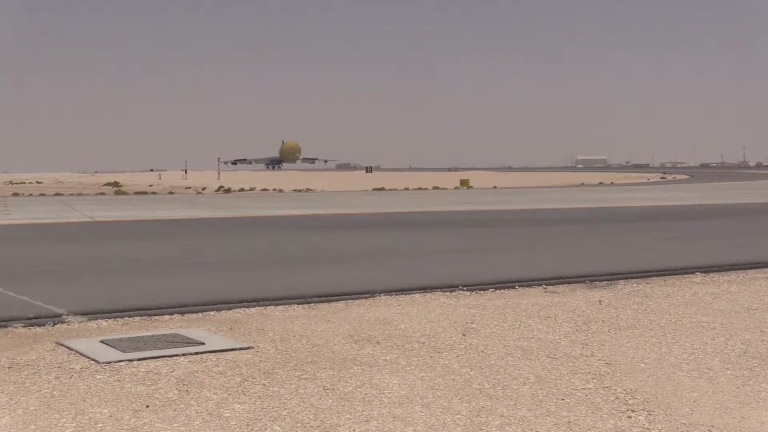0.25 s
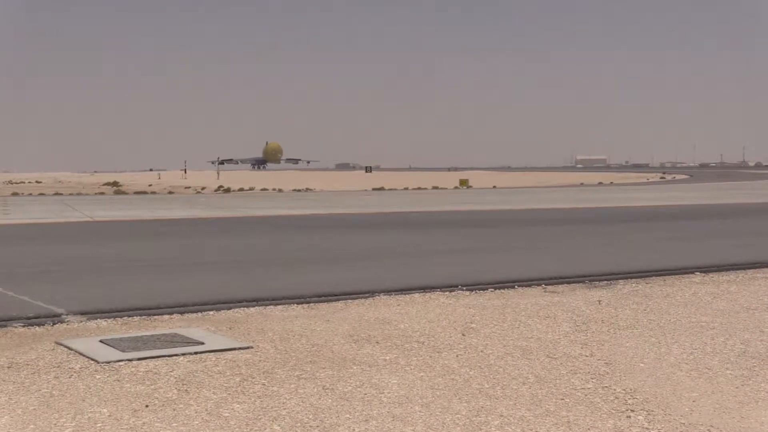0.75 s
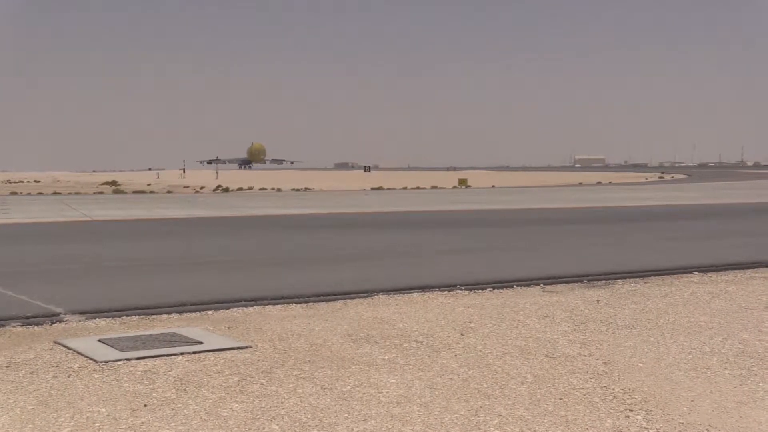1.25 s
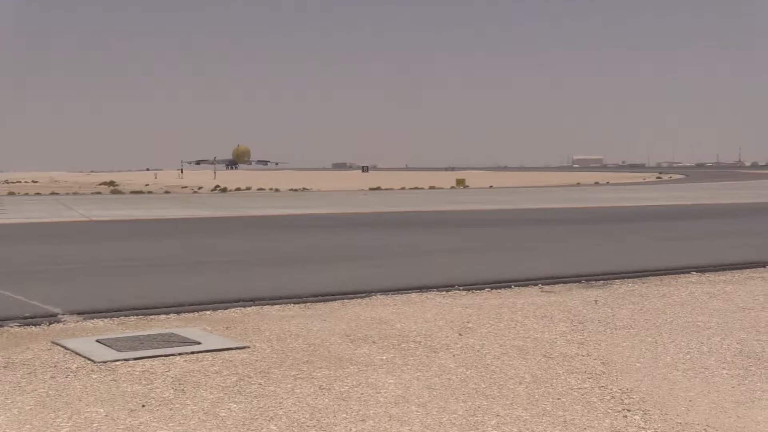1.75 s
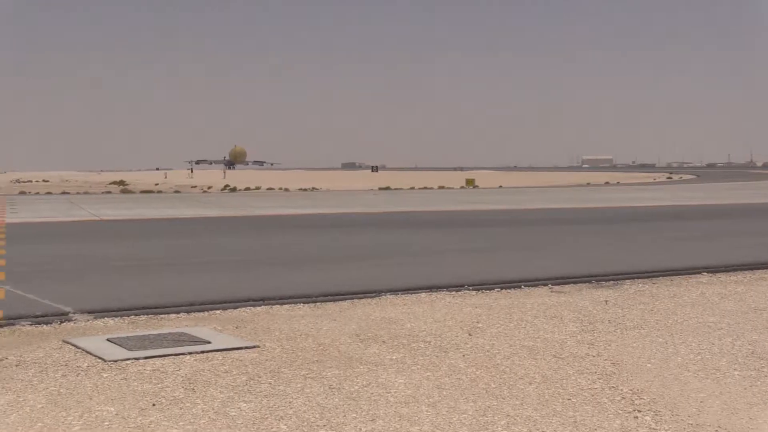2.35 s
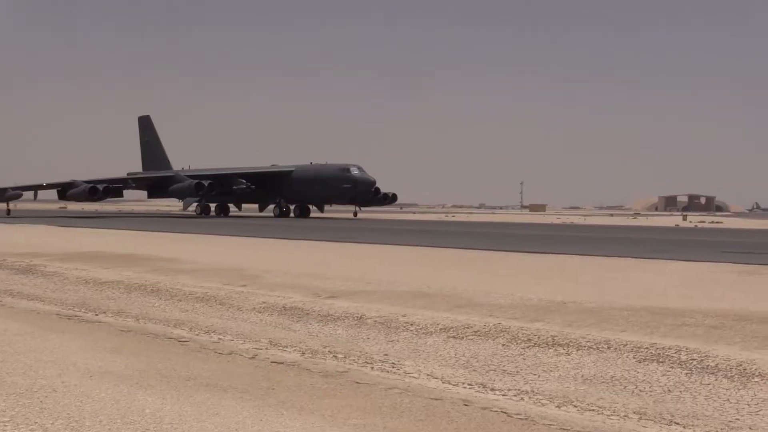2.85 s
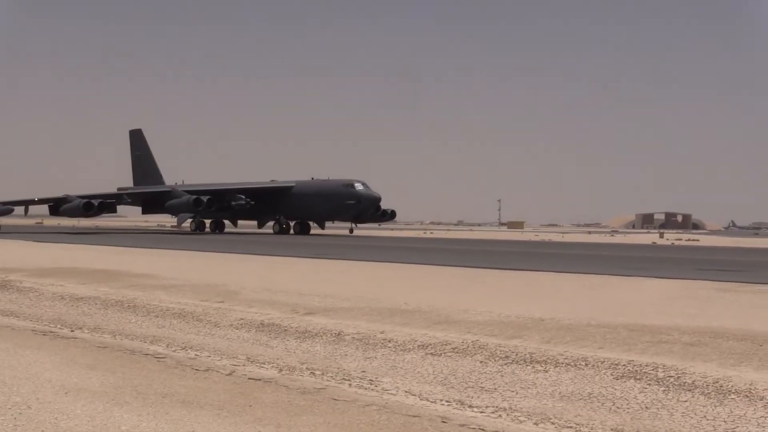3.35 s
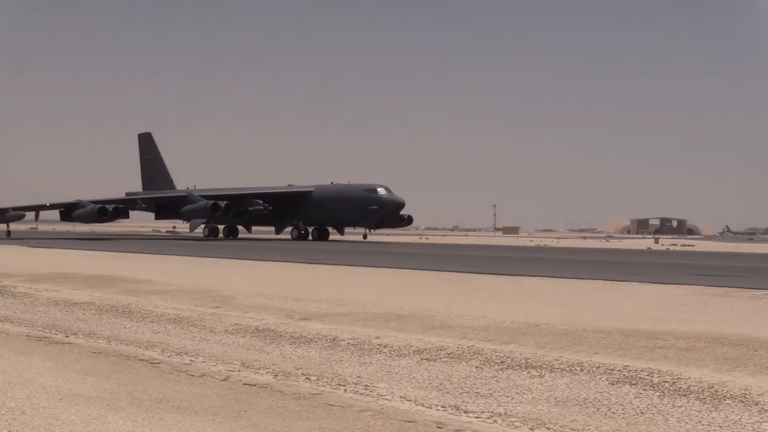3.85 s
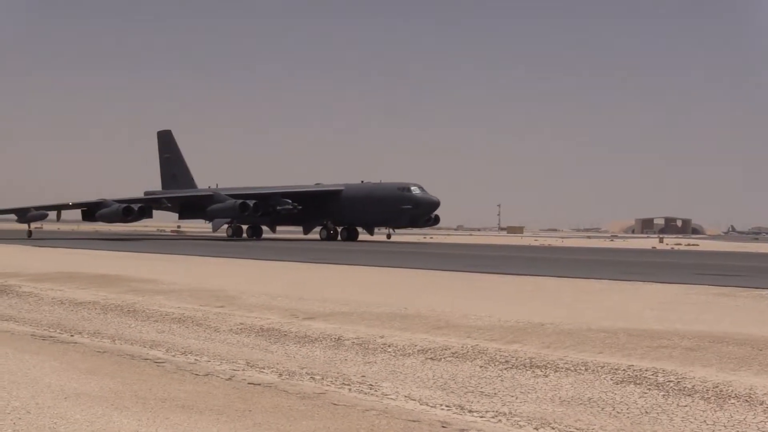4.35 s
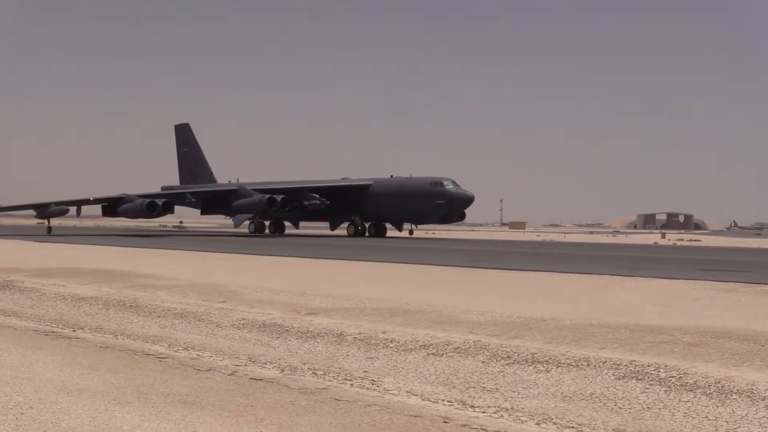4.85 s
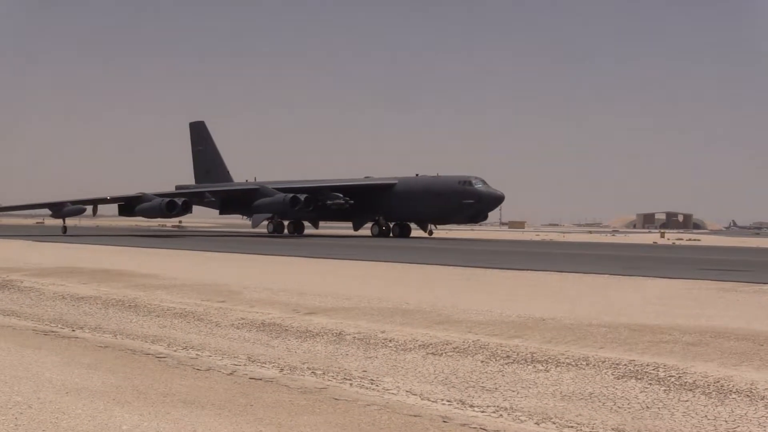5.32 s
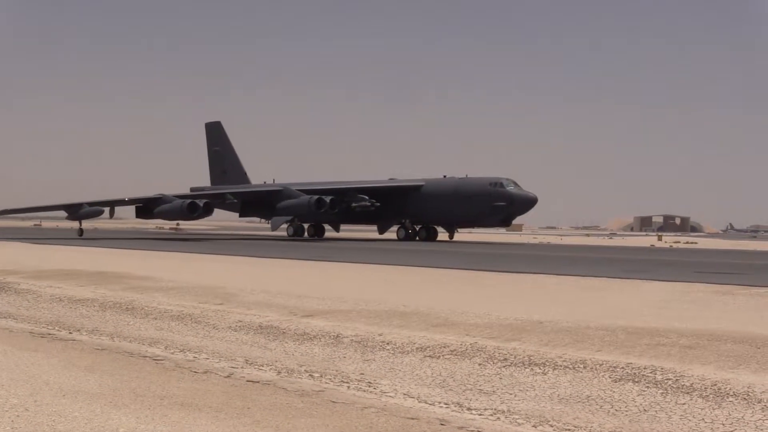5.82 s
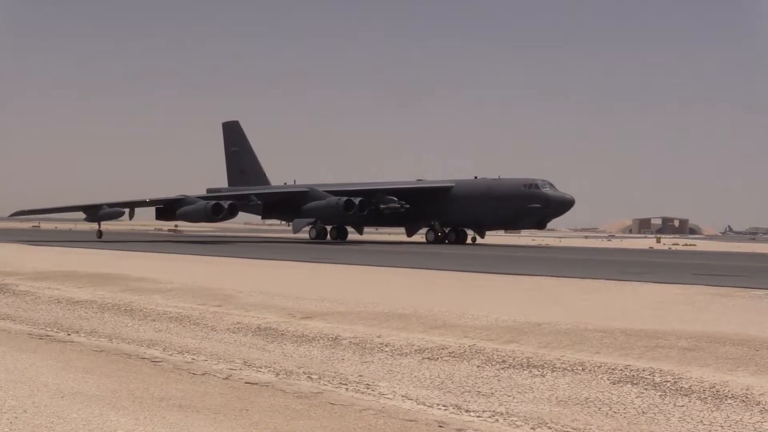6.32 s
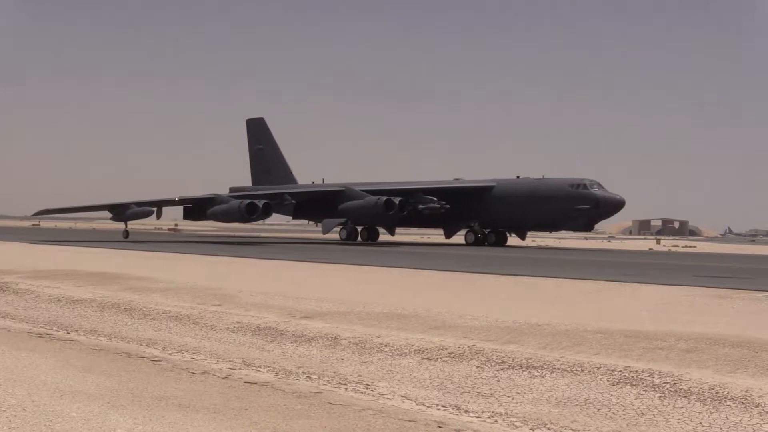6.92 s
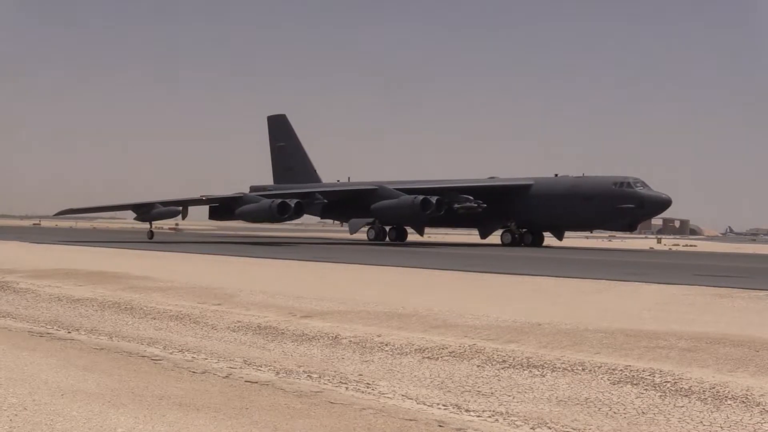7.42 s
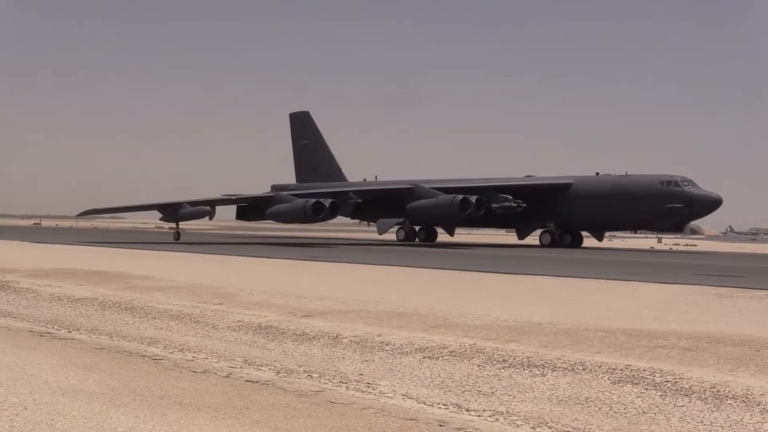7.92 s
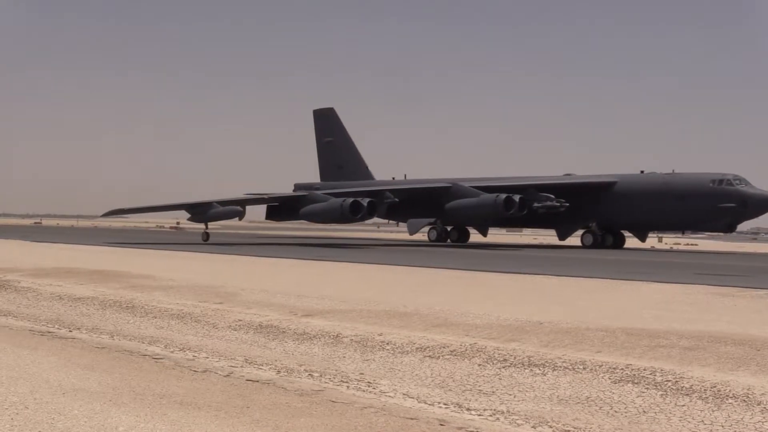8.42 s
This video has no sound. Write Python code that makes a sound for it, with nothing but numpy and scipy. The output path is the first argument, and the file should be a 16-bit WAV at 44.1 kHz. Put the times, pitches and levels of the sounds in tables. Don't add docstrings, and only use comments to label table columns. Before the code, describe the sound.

From 0 to about 2.7 seconds a large jet rolls away across an open desert airfield: soft low exhaust rumble with slight surges, dull airy rush and a smeared whine near 1 kHz, all slowly fading. Close to the microphone, a small plastic mechanism rattles from about 0.8 to 1.2 seconds in rapid faint dry ticks, with stray clicks near 1.7 and 2.4. At 2.7 an abrupt cut makes everything much louder: a many-engined jet taxis near. Several fans whine just above 1 kHz, slightly apart, beating and shimmering with shrill harmonics over broad hissing rush and steady rumble. Individual whines swell and recede as the plane turns, pitch sinking slightly. Low exhaust puffs come near 4.6, 5.0 and 7.7 seconds. The treble is duller just after the cut, then clears, and the whine is strong and brightest by the end at 8.7. Dry outdoors, faint microphone hiss.

```python
import sys
import numpy as np
from scipy import signal
from scipy.io import wavfile
from scipy.ndimage import uniform_filter1d

SR = 44100
rng = np.random.default_rng(int(sys.argv[2]) if len(sys.argv) > 2 else 0)


def elevation(decibels):
    levels = np.asarray(decibels, float)
    return 10 ** (levels / 20)


def to_wav(sig):
    pcm = np.clip(np.atleast_2d(sig), -1, 1) * 32767
    pcm = np.round(pcm).astype(np.int16)
    wavfile.write(sys.argv[1], SR, pcm.T)


N = 382788
T = np.arange(N) / SR
COARSE_T = T[::128]

CUT_S = 2.6675
CUT = round(CUT_S * SR)
FAR_END = CUT + 1000
HISS_DB = -88.5

# freq_hz, density_db_per_hz
FAR_RUMBLE = [(12, -48), (20, -25), (91, 0), (173, -5.5), (242, -12.5), (300, -12), (400, -25), (520, -53),
              (880, -120)]
# freq_hz, density_db_per_hz
FAR_RUSH = [(150, -2), (400, -5.5), (800, -11.5), (1600, -15), (2400, -21), (3500, -25), (4500, -35),
            (5500, -42), (7000, -62), (12000, -90)]
# freq_hz, width_hz, over_rush_db
FAR_HUMS = [(492.4, 14, 6), (566.4, 22, 10)]
FAR_FAN_RATES = [922, 945, 956, 980, 992, 1012, 1035]
FAR_FAN_LEVELS = [-4, 0.5, 2.5, -2.5, 0, 2, -7.5]
FAR_HARMONIC_LEVELS = [-0.7, -13, -17.5]
FAR_START_LEVELS = [-43.5, -54.5, -52]
FAR_FADES = [2.1, 1.23, 1.4]
# centre_s, half_width_s, peak_db
FAR_SURGES = [
    (.55, .06, -50),
    (1.15, .05, -49),
    (1.58, .04, -48),
]

# into_turn_s, peak_db, ring_hz, rasp_db
TURN_TICKS = [
    (0, -72, 5270, -80),
    (.0153, -74, 5350, -85),
    (.0354, -72, 5400, -79),
    (.0659, -68, 5380, -82),
]
# start_s, peak_db, ring_hz, rasp_db
STRAY_TICKS = [
    (1.699, -80, 5170, -90),
    (1.7494, -77, 5450, -89),
    (2.4009, -77, 5010, -85),
]
# start_s, end_s, level_db
GEAR_WHIRR = (.76, 1.18, -89)

# freq_hz, density_db_per_hz
NEAR_RUMBLE = [(15, -38), (30, -33), (60, -18), (88, -3), (99, 1), (112, -3.5), (200, -5.5), (400, -10.5),
               (700, -51), (1200, -93)]
# centre_s, half_width_s, peak_db
EXHAUST_SURGES = [
    (4.62, 0.069, -39.5),
    (4.95, 0.076, -41.5),
    (5.3, .2, -49),
    (7.67, 0.1, -41),
]
# freq_hz, density_db_per_hz
NEAR_RUSH = [(200, -7.5), (430, -3.5), (600, -0.5), (1400, 1.5), (1950, -1), (2600, -1.5), (3700, -6.5),
             (6100, -14.5), (9000, -24.5), (12000, -41), (14000, -55.5), (16000, -75)]
# freq_hz, width_hz, over_rush_db
BLADE_HEAPS = [(1083, 168, 9.5), (1197, 130, 7.5), (1785, 170, 2.5), (2197, 274, 6), (3314, 380, 6),
               (4490, 160, 8.5), (5200, 940, 2.5), (6790, 670, 5)]
# time_s, extra_loss_at_10_khz_db
APPROACH = [
    (2.67, 7),
    (2.9, 8.5),
    (3.15, 1.5),
    (3.5, 1),
    (5.3, 3),
    (5.95, 0.5),
    (6.3, 2),
    (7.65, -4.5),
    (8.0, -1),
    (8.68, -7),
]
# resting_hz, start_above_hz, settling_s
FAN_RATES = [(1115.5, 24.2, 2.6), (1113, 9.5, 5.5), (1103, 23.6, 3.9), (1070, 26.5, 2.7), (1071, 4.8, 3),
             (1046, 32, 2.4)]
FAN_SLOWING = [0, 0, 0, 0, 7.5, 0]
CORE_TONES = [0, 2.693, 0, 1.938, 0, 0]
FAN_TRIMS = [0.78, 3.3, 0.9, 1.1, 2.1]
OVERTONES = [2.594, 4.783, 5, 5.187, 5.781, 6, 7, 8]
OVERTONE_LEVELS = [-58, -67, -58, -69.5, -75, -65, -68.5, -77]
BETWEEN_BEAMS = {"blade": -54, "stage": -59, "2nd": -56, "3rd": -61, "4th": -65, "core": -62}
FAN_1_BEAMS = {"blade": [(3.0, 0.72, -32.5), (4.5, 0.92, -35), (5.8, 0.57, -31.5), (7.9, 1.5, -27)],
               "stage": [(3.0, .35, -51), (4.2, .7, -44), (8.4, 0.44, -46)], "2nd": [(3.8, 0.32, -45),
               (4.7, .6, -45.5), (6.45, 0.59, -44.5), (8.1, 0.74, -44.5)], "3rd": [(3.5, 0.62, -44.5),
               (4.4, .6, -52), (7.0, 0.33, -51), (8.7, .4, -48)], "4th": [(5.9, .6, -53), (7.4, .3, -53),
               (8.7, .3, -46)]}
FAN_2_BEAMS = {"blade": [(3.7, 0.48, -31.5), (4.95, 0.74, -30), (7.1, 0.38, -30)],
               "stage": [(3.4, 0.48, -48), (6.5, 0.66, -45), (7.4, .2, -47)], "2nd": [(3.6, 0.45, -46),
               (5.5, .5, -43), (6.5, 0.59, -42.5), (8.4, .4, -41)], "3rd": [(2.7, 0.93, -40),
               (4.0, 0.34, -39), (5.8, 1.5, -46.5), (7.4, 0.83, -44), (8.7, .3, -46)],
               "4th": [(3.3, .4, -51.5), (4.65, .25, -49.5), (5.75, 0.46, -45), (7.4, 0.57, -50)],
               "core": [(3.3, 0.67, -47.5), (5.2, 0.44, -45.5), (6.8, 0.49, -45.5), (8.0, 1.1, -46.5)]}
FAN_3_BEAMS = {"blade": [(3.5, .3, -36), (4.7, 0.2, -38.5), (5.8, .9, -31.5), (7.0, 0.84, -31.5),
               (8.3, 0.59, -29)], "stage": [(4.8, 0.67, -43), (6.7, .5, -49), (8.7, .4, -45.5)],
               "2nd": [(3.4, 0.28, -40), (4.2, 0.46, -50), (7.3, 0.47, -40), (8.6, 0.58, -35)],
               "3rd": [(3.4, 0.71, -41), (4.1, .4, -42.5), (8.7, 0.44, -41)], "4th": [(4.4, .5, -51.5),
               (7.4, .4, -53), (8.7, .4, -53)]}
FAN_4_BEAMS = {"blade": [(2.8, .6, -33.5), (3.85, 0.39, -29.5), (5.9, 0.62, -39), (7.4, 0.66, -37.5),
               (8.7, 0.34, -33)], "stage": [(2.9, 0.27, -51), (3.8, 0.26, -47.5), (5.0, .7, -48.5),
               (7.7, .6, -51), (8.7, 0.18, -47)], "2nd": [(3.7, .4, -40.5), (4.8, 0.43, -36),
               (6.2, 0.71, -51), (7.9, .9, -42)], "3rd": [(2.7, .4, -47), (3.4, .5, -44), (5.0, 0.22, -44),
               (5.9, 0.39, -41)], "4th": [(2.75, .2, -53.5), (3.3, .3, -50.5), (5.35, 0.7, -50.5),
               (6.8, 0.36, -48), (7.7, 0.7, -50), (8.7, 0.38, -45.5)], "core": [(3.4, 0.69, -41),
               (4.5, 0.65, -49)]}
FAN_5_BEAMS = {"blade": [(3.6, 0.8, -35.5), (5.5, 1.3, -41.5)], "stage": [(3.2, .5, -50)],
               "2nd": [(3.8, .5, -47)], "3rd": [(3.2, 0.63, -49), (6.15, 0.22, -49)],
               "4th": [(2.7, .15, -49)]}
FAN_6_BEAMS = {"blade": [(2.7, .4, -47), (3.65, 0.17, -37.5), (4.7, .3, -49), (6.2, .25, -40)],
               "stage": [(4.15, .2, -48)], "2nd": [(2.7, .25, -47), (3.7, .4, -47)],
               "3rd": [(3.5, 0.18, -53), (4.3, 0.37, -54)], "4th": [(2.95, .2, -54), (3.5, 0.38, -47.5),
               (4.3, 0.22, -53)]}


def evened(x):
    return x / np.sqrt(np.mean(x ** 2) + 1e-20)


def spectrum_db(points, hz):
    point_hz, level_db = np.transpose(points)
    return np.interp(np.log(hz + 1), np.log(point_hz + 1), level_db)


def heaped_db(hz, heaps):
    lift = sum((elevation(2 * db) - 1) / (1 + (2 * (hz - f) / width_hz) ** 2) ** 2 for f, width_hz, db in heaps)
    return 10 * np.log10(np.maximum(1 + lift, .01))


def swept_db(passes, floor_db, t):
    power = elevation(2 * floor_db)
    for centre_s, half_s, peak_db in passes:
        power = power + elevation(2 * (peak_db - 6 * abs((t - centre_s) / max(half_s, .02)) ** 3))
    return 10 * np.log10(power) + 0 * t


def drift(top_hz, count):
    hz = np.geomspace(.4, top_hz, 16)[:, None]
    starts = rng.random((count, 16, 1))
    return [evened((np.sin(2 * np.pi * (hz * COARSE_T + start)) / np.sqrt(hz)).sum(0)) for start in starts]


def airflow(shape_db, band_hz, patchy_db=0, gust_db=0, size=1024, count=N):
    hop = size // 4
    frames, hz = count // hop + 5, np.fft.rfftfreq(size, 1 / SR)[:, None]
    real, imag, patches = rng.standard_normal((frames, len(hz), 3)).T
    patches = uniform_filter1d(patches, size=14, axis=0)
    patches = evened(uniform_filter1d(patches, size=16, axis=1))
    gusts = uniform_filter1d(rng.standard_normal(frames), size=12)
    gusts = evened(uniform_filter1d(gusts, size=6))
    ruffle = np.minimum(hz / 5000, 1)
    field_db = shape_db(hz, np.arange(frames) * hop / SR) + ruffle * (patchy_db * patches + gust_db * gusts)
    field = (real + 1j * imag) * elevation(field_db)
    in_band = (hz > band_hz[0]) * (hz < band_hz[1])
    share = np.sum(abs(field * in_band) ** 2) / np.sum(abs(field) ** 2)
    flow = signal.istft(field, nperseg=size, noverlap=size - hop)[1][:count]
    return np.pad(evened(flow) / np.sqrt(share), (0, N - count))


def microphone_hiss():
    lowpass = signal.butter(24, 12100, fs=SR, output="sos")
    return elevation(HISS_DB) * signal.sosfilt(lowpass, rng.standard_normal(N))


def far_loss_db(hz, t):
    loss_at_4_khz_db_per_s = 2.5
    return loss_at_4_khz_db_per_s * np.minimum(t, CUT_S) * (hz / 4000) ** 2


def far_whine_db(hz, t, blur_hz=9.6):
    power = 0
    for rate_hz, fan_db in zip(FAR_FAN_RATES, FAR_FAN_LEVELS):
        for k, harmonic_db in enumerate(FAR_HARMONIC_LEVELS, 1):
            offset = 2 * (hz - k * rate_hz) / (k * blur_hz)
            power = power + elevation(2 * (fan_db + harmonic_db)) / k / (1 + offset ** 2) ** 1.43
    return 10 * np.log10(power) - far_loss_db(hz, t)


def far_jet():
    def rush_shape_db(hz, t):
        return spectrum_db(FAR_RUSH, hz) + heaped_db(hz, FAR_HUMS) - far_loss_db(hz, t)

    levels_db = [start_db - fade * T for start_db, fade in zip(FAR_START_LEVELS, FAR_FADES)]
    rumble_db, rush_db, whine_db = levels_db
    rumble_db = swept_db(FAR_SURGES, rumble_db, T)
    rumble = airflow(lambda hz, t: spectrum_db(FAR_RUMBLE, hz), (40, 350), size=4096, count=FAR_END)
    rush = airflow(rush_shape_db, (400, 850), patchy_db=1.5, gust_db=.6, size=2048, count=FAR_END)
    whine = airflow(far_whine_db, (900, 1060), size=8192, count=FAR_END)
    return elevation(rumble_db) * rumble + elevation(rush_db) * rush + elevation(whine_db) * whine


def shutter(t60_s=.045, rise_s=.007):
    start_s, turn_s, turns = .7736, .1084, 4
    ticks = [(start_s + k * turn_s + s, *rest) for k in range(turns) for s, *rest in TURN_TICKS]
    ticks = ticks + list(STRAY_TICKS)
    out, t = np.zeros(N), np.arange(2400) / SR
    envelope = elevation(-60 * t / t60_s) * np.minimum(t / rise_s, 1) ** 2
    rasp_band = signal.butter(2, (5400, 8800), "bandpass", fs=SR)
    for tick_s, peak_db, ring_hz, rasp_db in ticks:
        noise = rng.standard_normal(len(t))
        ring = evened(signal.lfilter(*signal.iirpeak(ring_hz, 7.0, SR), noise))
        rasp = evened(signal.lfilter(*rasp_band, noise[::-1]))
        tick = elevation(peak_db + 5) * ring + elevation(rasp_db + 7) * rasp
        out[round((tick_s - rise_s) * SR):][:len(t)] += envelope * tick
    whirr_start_s, whirr_end_s, whirr_db = GEAR_WHIRR
    gear_band = signal.butter(3, (4500, 8500), "bandpass", fs=SR)
    gear = evened(signal.lfilter(*gear_band, rng.standard_normal(N)))
    out += elevation(whirr_db) * gear * (T > whirr_start_s) * (T < whirr_end_s)
    return signal.sosfilt(signal.butter(12, 11800, fs=SR, output="sos"), out)


def air_loss_db(hz, t):
    time_s, loss_db = np.transpose(APPROACH)
    return np.interp(t, time_s, loss_db) * (hz / 10000) ** 1.6


def near_exhaust():
    rumble = airflow(lambda hz, t: spectrum_db(NEAR_RUMBLE, hz), (40, 350), size=4096)
    level_db = swept_db(EXHAUST_SURGES, -43 + 0.38 * (T - CUT_S), T)
    return elevation(level_db) * rumble


def near_intake():
    def shape_db(hz, t):
        return spectrum_db(NEAR_RUSH, hz) + heaped_db(hz, BLADE_HEAPS) - air_loss_db(hz, t)

    rush = airflow(shape_db, (450, 900), patchy_db=1.1, gust_db=0.44)
    return elevation(-40 + 0.04 * (T - CUT_S)) * rush


def fan(rate, slowing_hz_per_s, core, beams, twinkle_db=1.9, wobble_turns=.018):
    throttle_back_s, second_stage = 5.6, 1.594
    rest_hz, above_hz, settle_s = rate
    hz = rest_hz + above_hz * np.exp((CUT_S - COARSE_T) / settle_s)
    hz = hz - slowing_hz_per_s * np.maximum(COARSE_T - throttle_back_s, 0)

    swept = [swept_db(beams.get(tone, []), floor_db, COARSE_T) for tone, floor_db in BETWEEN_BEAMS.items()]
    *levels_db, core_db = swept
    levels_db = [db + trim_db for db, trim_db in zip(levels_db, FAN_TRIMS)]
    beam_db = .5 * (levels_db[-1] + 52.5)
    for k, db in zip(OVERTONES, OVERTONE_LEVELS):
        levels_db.append(db + beam_db - air_loss_db(k * hz, COARSE_T))
    multiples = [1, second_stage, 2, 3, 4, *OVERTONES]
    if core:
        multiples.append(core)
        levels_db.append(core_db)

    late = signal.resample_poly(drift(30, count=1)[0], 128, 1)[:N]
    turns = (np.cumsum(np.interp(T, COARSE_T, hz)) / SR + wobble_turns * late)[CUT:]
    out = np.zeros(N)
    for k, db, twinkle in zip(multiples, levels_db, drift(25, count=len(multiples))):
        level = np.interp(T[CUT:], COARSE_T, elevation(db + twinkle_db * twinkle))
        phase = 2 * np.pi * ((k * turns + rng.random()) % 1)
        out[CUT:] += level * np.sin(phase.astype(np.float32))
    return np.sqrt(2) * out


def near_jet():
    beams = (FAN_1_BEAMS, FAN_2_BEAMS, FAN_3_BEAMS, FAN_4_BEAMS, FAN_5_BEAMS, FAN_6_BEAMS)
    fans = sum(fan(*engine) for engine in zip(FAN_RATES, FAN_SLOWING, CORE_TONES, beams))
    return near_exhaust() + near_intake() + fans


def scene():
    near = np.clip((T - CUT_S) / .00005, 0, 1)
    mix = (1 - near) * (far_jet() + shutter()) + near * near_jet() + microphone_hiss()
    return mix[None]


def top_cut(x):
    return signal.sosfilt(signal.butter(12, 14960, fs=SR, output="sos"), x)


def record(dry):
    thin = signal.lfilter(*signal.butter(2, 30, "highpass", fs=SR), dry)
    return top_cut(thin)


dry = scene()
out = record(dry)
to_wav(out)
```